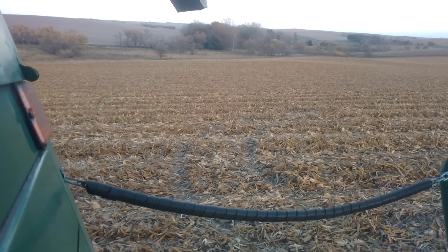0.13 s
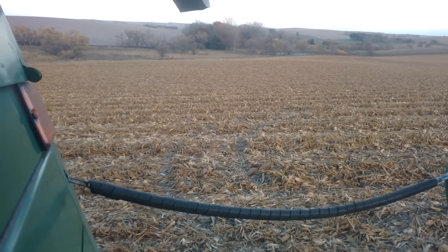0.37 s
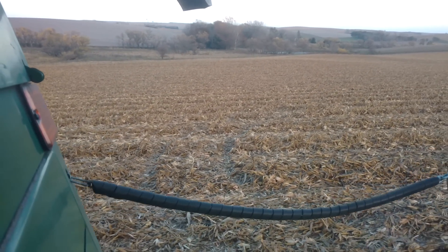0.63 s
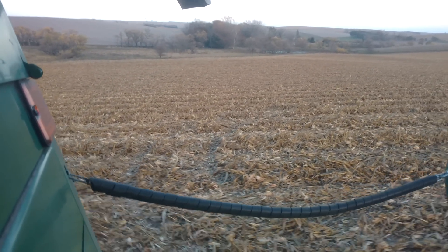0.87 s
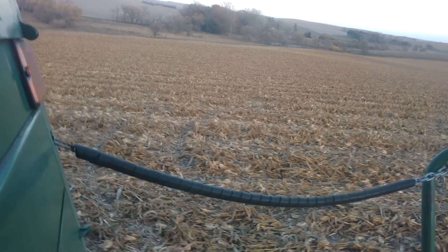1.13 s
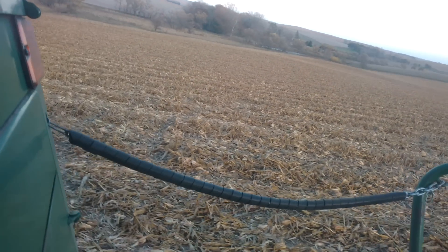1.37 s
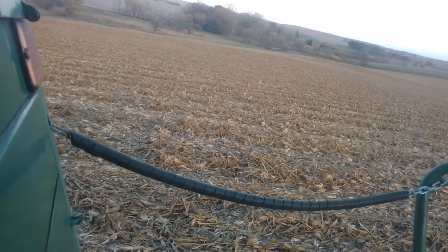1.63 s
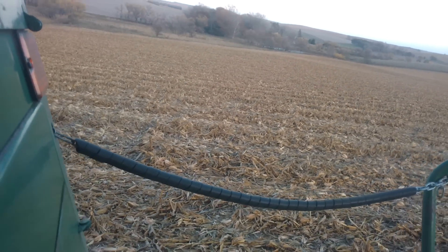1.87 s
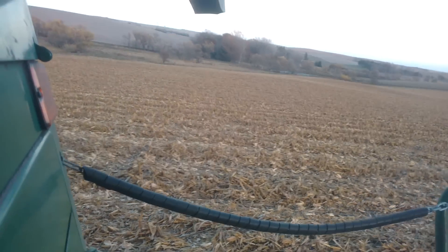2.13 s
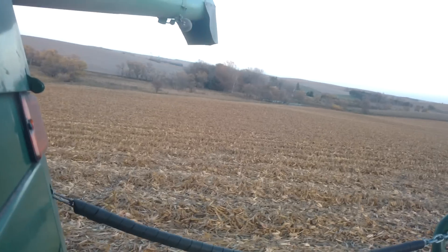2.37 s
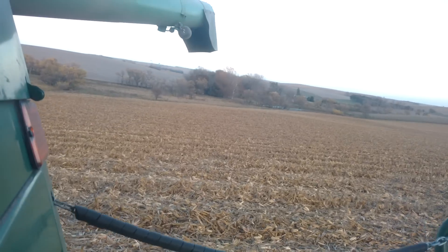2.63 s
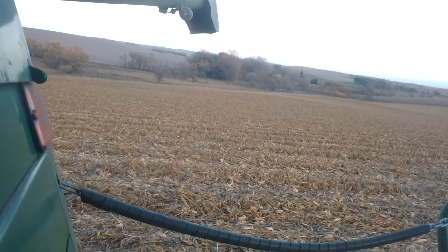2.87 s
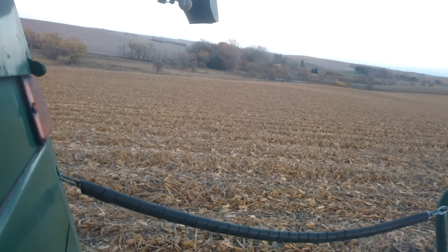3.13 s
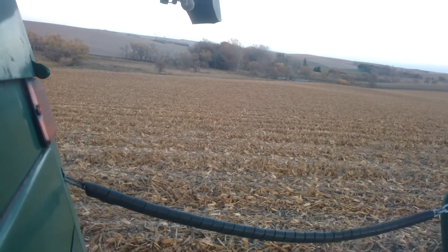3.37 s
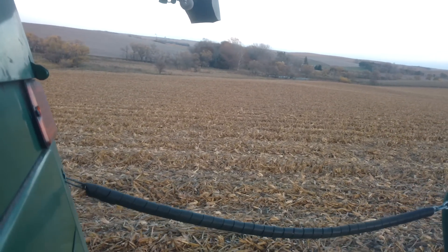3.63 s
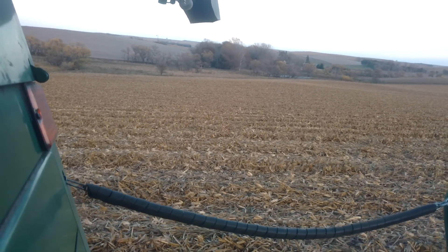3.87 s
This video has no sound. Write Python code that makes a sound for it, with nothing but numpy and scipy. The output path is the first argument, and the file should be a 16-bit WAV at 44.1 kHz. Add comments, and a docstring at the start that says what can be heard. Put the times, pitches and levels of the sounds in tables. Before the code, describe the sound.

Steady engine roar and a mid-pitched hydraulic whine from a harvester, with small dry rattles and knocks.

```python
"""In a stubble field a large farm machine runs, heard from its platform on a small hand-held recorder.
A pump whine, a wandering moan and the orders of a loaded shaft are sums of wavering sinusoids; panels hum as
narrow noise resonances. A broad roar of engine, fan and crop is random short-time spectra; chaff ticks are
filtered impulses with grit, one puff is a noise burst, and faint metal knocks are decaying clusters of modes.
Two microphone ports are widened by delayed cross-subtraction."""
import sys
import numpy as np
from scipy import signal
from scipy.fft import rfft, irfft, next_fast_len
from scipy.io import wavfile
from scipy.ndimage import uniform_filter1d

SR = 44100
rng = np.random.default_rng(int(sys.argv[2]) if len(sys.argv) > 2 else 0)


def dump_mix(stems):
    """Bounce the given channels to the path in sys.argv[1] as a 16-bit WAV at rate SR."""
    frames = np.atleast_2d(stems).T  # one column per channel
    limited = np.clip(frames, -1, 1)  # hard clip at full scale
    pcm = np.round(limited * 32767).astype(np.int16)
    wavfile.write(sys.argv[1], SR, pcm)


def magnitude_from_level(level_db):
    """Linear magnitude for a level in decibels (20 dB per decade)."""
    exponent = np.asarray(level_db, float) / 20
    return 10 ** exponent


N = 176400
T = np.arange(N) / SR
WANDER_HZ = 3  # drift of the hums in pitch, rms at most
HUM_SINK_DB = 2.8  # rms level drift of the moan and the passing hums


def evened(x):
    """Normalisation: scales to rms 1."""
    return x / np.sqrt(np.mean(abs(x) ** 2) + 1e-20)


def curve(rows, column=1, t=T):
    """Linear interpolation of a control curve in time."""
    return np.interp(t, [r[0] for r in rows], [r[column] for r in rows])


def slow(rate_hz, size=N):
    """Band-limited random drift: straight lines between Gaussian knots, rms about 1."""
    step = round(SR / rate_hz)
    knots = rng.standard_normal(size // step + 2)
    return 1.2 * np.interp(np.arange(size) / step, np.arange(len(knots)), knots)


def ports(z, db, pan_db, lead):
    """Interaural-style level and phase differences: sets an analytic signal on two ports, lead in rad."""
    side = magnitude_from_level(pan_db / 2) * np.exp(.5j * lead)
    return np.sqrt(2) * magnitude_from_level(db) * np.array([(z * side).real, (z / side).real])


def tone(hz):
    """Phase integration of a frequency, with small random modulation of level and phase."""
    level_db, phase_rad = 1.0 * slow(rate_hz=23), 0.1 * slow(rate_hz=30)
    cycles = np.cumsum(hz) / SR + rng.random()
    return magnitude_from_level(level_db) * np.exp(1j * (2 * np.pi * cycles + phase_rad))


def hum(hz, width_hz, size=N):
    """Resonance: complex noise through two equal one-pole filters, shifted to a drifting centre."""
    pole = np.exp(-np.pi * width_hz / SR)
    z = rng.standard_normal((size + SR, 2)) @ [1, 1j]
    for _ in range(2):
        z = signal.lfilter([1], [1, -pole], z)
    z = z[SR:]  # the first second lets the filters settle
    drift = min(width_hz, WANDER_HZ) * slow(rate_hz=2, size=size)
    return evened(z) * np.exp(2j * np.pi * np.cumsum(hz + drift) / SR)


def add(mix, s, sound):
    """Superposition: mixes a two-port sound in at time s."""
    at = round(s * SR)
    sound = sound[:, max(-at, 0):N - at]
    mix[:, max(at, 0):max(at, 0) + sound.shape[1]] += sound


# Pump speed and whine. Each row: time in seconds, shaft speed in Hz, level in dB of the seventh order
# before the port gain.
PUMP_RUN = [(0, 73.14, -17), (.25, 72.8, -17), (.7, 73.4, -20), (.9, 73.6, -19), (1.12, 73.8, -24.5),
            (1.24, 73.6, -24), (1.3, 73.6, -19), (1.5, 73.2, -15), (1.7, 72.5, -16), (2, 72.7, -16.5),
            (2.2, 73, -17), (2.36, 73.2, -10.5), (2.5, 73.4, -19.5), (2.63, 73.4, -22.5),
            (2.82, 73.4, -17.5), (3.05, 73.4, -22.5), (3.5, 73.7, -18), (3.8, 72.9, -16), (4, 73.1, -20)]
# The hand turns the recorder, shifting the whine. Each row: time in seconds, added left-right level in dB.
RECORDER_TURN = [(0, 0), (.6, 3.5), (1.2, -5), (1.8, -0.5), (2.3, -3), (2.8, 1.5), (4, 1)]
# Other pump lines. Each order of the shaft has: level in dB, left-right level in dB, left lead in rad.
PUMP_LINES = {10: (-42.5, 4, -.4), 21: (-47.5, 0.72, 2.09)}


def pump():
    """Harmonic orders: a rotating pump sounds at whole multiples of its shaft speed."""
    shaft_hz = curve(PUMP_RUN)
    whine = tone(7 * shaft_hz) * magnitude_from_level(curve(PUMP_RUN, column=2))
    out = ports(whine, db=-2.08, pan_db=2.9, lead=.1)
    out *= magnitude_from_level(np.outer([.5, -.5], curve(RECORDER_TURN)))
    return out + sum(ports(tone(k * shaft_hz), *place) for k, place in PUMP_LINES.items())


# A wandering drive. Each row: time in seconds, pitch in Hz, level in dB before the port gain.
DRIVE_MOAN = [(0, 364.5, -33.5), (.5, 364.2, -30.5), (.58, 366, -24.5), (.72, 369, -30), (.85, 371, -21.5),
              (1.22, 370.8, -30.5), (1.36, 367, -21), (1.6, 364.5, -24.5), (2.3, 367.8, -35),
              (3.05, 363.3, -35.5), (3.3, 364.4, -25.5), (4, 360.7, -37)]


def moan():
    """Frequency and amplitude modulation: one line of a drive wanders in pitch and level."""
    level_db = curve(DRIVE_MOAN, column=2) + HUM_SINK_DB * slow(rate_hz=12)
    return ports(tone(curve(DRIVE_MOAN)) * magnitude_from_level(level_db), db=0.39, pan_db=2.5, lead=0.48)


# Loaded shaft, its speed wandering up and down. Each row: time in seconds, shaft speed in Hz.
SHAFT_SPEED = [(0, 70), (.25, 70.2), (.7, 70.5), (1.1, 72.1), (1.55, 69.63), (1.8, 70.7), (2.5, 70.84),
               (3, 71.3), (3.3, 70.7), (3.6, 70.3), (3.95, 71.8)]
# Lines of that shaft. Each order has: level in dB, left-right level in dB, left lead in rad.
SHAFT_LINES = {3: (-28.5, -2, -0.6), 6: (-43.5, .8, .1), 8: (-34.5, .8, 1.3), 12: (-48.5, 2.5, .1)}


def loaded_shaft():
    """Harmonic orders: all lines of the loaded shaft follow one changing speed."""
    shaft_hz = curve(SHAFT_SPEED)
    return sum(ports(tone(k * shaft_hz), *place) for k, place in SHAFT_LINES.items())


# Panels that hum all the time. Each row: centre in Hz, width in Hz of each of two cascaded filters,
# level in dB, left-right level in dB, left lead in rad.
STEADY_PANELS = [(113.6, 3.7, -30, 1.4, 0.5), (134.1, 4.2, -28, 1.5, 0.38), (153.5, 4.5, -35, 3, 0.15),
                 (172.3, 1.9, -38, 0, -0.1), (727, 24, -41.5, -1.5, -0.6), (943, 30, -45.5, -2, 1),
                 (1846, 61, -48, -6.5, 3), (2050, 80, -47.5, 0, 2.5), (2260, 60, -50.5, 0.5, 2.5),
                 (2680, 82, -52, -1, -1.5), (3294, 120, -57.5, 2.5, 0.6), (10820, 460, -72, 4.5, 1)]


def panels():
    """Forced resonance: sheet metal turns noise into narrow bands around its modes."""
    return sum(ports(hum(hz, width_hz), *place) for hz, width_hz, *place in STEADY_PANELS)


# Hums that come and go. Each row: start in seconds, length in seconds, mean pitch in Hz,
# level in dB before swell and drift, left-right level in dB.
PASSING_HUMS = [(-.3, .9, 330, -27, -1), (.3, 1.6, 494, -29, 2), (1.12, .25, 499, -23, 1),
                (.45, 1.65, 622, -33, 1), (2.8, .7, 598, -36, 4), (3.15, .4, 300, -33, 3),
                (3.1, .7, 742, -40, 0), (2.15, .3, 211, -28, -3), (3.2, .45, 458, -34, 2)]


def passing_hums():
    """Amplitude envelopes: single wandering lines swell up and fade out."""
    out = np.zeros((2, N))
    for s, length_s, hz, db, pan_db in PASSING_HUMS:
        size = round(length_s * SR)
        line = tone(hz + WANDER_HZ * slow(rate_hz=4))[:size]
        swell = np.hanning(size) ** .3
        drift = magnitude_from_level(HUM_SINK_DB * slow(rate_hz=8, size=size))
        add(out, s, ports(line * drift * swell, db, pan_db, lead=0))
    return out


# Chaff ticks. Each row: start in seconds, peak level in dB before the common lift, left-right level in dB,
# dullness in dB (low part over high part, before the common body is added).
CHAFF_TICKS = [(.3945, -45, 4, 0), (.596, -45, 2, 2), (.9829, -37, 3, 4), (1.0038, -36, 1, -6),
               (1.0337, -44, 0, 2), (1.2872, -41, 3, 2), (1.3176, -44, 0, 7), (1.6773, -44, 3, 4),
               (1.7721, -43, 2, 5), (1.9237, -40, 4, -3), (2.479, -41, 1, 1), (2.7798, -45, 0, 7),
               (2.8895, -37, 3, 3), (3.0136, -35, 3, 3), (3.2243, -32, 4, 0)]


def chaff():
    """Impulse response: dry clicks with gritty tails excite a dull and a bright band, amid tiny ticks."""
    lift_db, body_db, grit_level, t60_s = 3.2, 5, .45, .005
    small_per_s, small_floor_db = 5, -60  # the floor is before the lift too
    out, t = np.zeros((2, N)), T[:600]
    rows = list(CHAFF_TICKS)
    for place, rarity, side in rng.random((round(4 * small_per_s), 3)):
        small_db = small_floor_db - 4 * np.log(1 - rarity)  # exponential spread: few loud ones
        rows.append((4 * place, small_db, 12 * side - 6, 6.))
    for s, db, pan_db, dull_db in rows:
        tails = grit_level * rng.standard_normal((3, len(t))) * magnitude_from_level(-60 * t / t60_s)
        clicks = tails + (t == 0)
        clicks = clicks[0] + clicks[1:]  # one shared part plus one of each port's own
        parts = []
        for hz in (4700, 9700):
            band = signal.butter(3, [hz / 1.7, hz * 1.33], "band", fs=SR, output="sos")
            part = signal.sosfilt(band, clicks)
            parts.append(part / abs(part).max())
        low, high = parts
        both = magnitude_from_level(dull_db + body_db) * low + high
        add(out, s, both * magnitude_from_level(db + lift_db + np.array([[pan_db], [-pan_db]]) / 2))
    return out


def dust_puff():
    """Partial coherence: a grainy treble noise burst, partly shared by the two ports."""
    start_s, length_s, gain_db, grain_db = 1.0, .085, -48, 3
    out, size = np.zeros((2, N)), round(length_s * SR)
    grain = magnitude_from_level(gain_db + grain_db * slow(rate_hz=400, size=size))
    envelope = np.hanning(size) ** .4
    shared, left, right = (hum(hz=8700, width_hz=5600, size=size).real for _ in range(3))
    add(out, start_s, (shared + .5 * np.array([left, right])) * grain * envelope)
    return out


# Knocks on the housing. Each row: start in seconds, level in dB before rise and decay, central pitch in Hz.
HOUSING_KNOCKS = [(0.979, -31, 2050), (1.3, -41, 1950), (2.39, -39, 2000), (2.954, -35.5, 1438),
                  (3.08, -26.5, 2000), (3.081, -35, 3256), (3.71, -37, 1404)]


def knocks():
    """Modal decay: each dull blow rings sixteen close modes around one pitch."""
    t60_s, rise_s, spread = .12, .006, .3  # spread is a share of the pitch
    out, t = np.zeros((2, N)), T[:SR // 4]
    envelope = np.minimum(t / rise_s, 1) * magnitude_from_level(-60 * t / t60_s)
    for s, db, hz in HOUSING_KNOCKS:
        place, turn = rng.random((2, 16))
        mode_hz = hz * (1 + spread * (place - .5))
        ring = np.exp(2j * np.pi * (mode_hz * t[:, None] + turn)).sum(1) / np.sqrt(16)
        add(out, s, ports(ring * envelope, db, pan_db=1.5, lead=1.3))
    return out


# Roar at the two ports. Each row: frequency in Hz, density in dB per Hz before trim and swell,
# left-right level in dB, likeness of the ports from 0 to 1, left lead in rad.
ROAR_SPECTRUM = [(30, -69, -5, 0.74, 1), (55, -63.5, -8, 0.67, 7.5), (81, -65.5, -0.5, 0.6, 2.5),
                 (115, -38.5, 0, 0.85, 0.23), (194, -46.5, -0.5, 0.85, -0.33), (243, -49, 1.5, 0.7, -0.2),
                 (295, -47.5, -5, 0.75, 0.32), (437, -50.5, 4, 0.6, -0.03), (582, -53, 7, 0.5, -0.05),
                 (790, -59, 1, 0.6, -0.5), (1047, -62, 2.5, 0.3, 0.84), (1246, -70.5, -0.5, 0.07, -1.5),
                 (1590, -68.0, 8, 0.7, 3), (2000, -65, -7, 0.59, 2), (2380, -68.5, -3.5, 0.6, 3.5),
                 (3080, -76.5, -6.5, 0.1, -0.5), (3250, -73.5, -0.5, 0.3, 4), (3800, -80, 2, 0.1, -3.5),
                 (5260, -83.5, -6.5, 0, -1.5), (6450, -92, -6, 0, 6), (8200, -94.5, 2, 0.09, -2.5),
                 (10600, -100, -1, 0, 5), (11500, -103.1, -3, 0, -12), (14000, -109.3, 1.5, 0.11, 9),
                 (15400, -119.3, -1.5, 0.15, -1.5)]
# Crop flow through the machine. Each row: time in seconds, level in dB (used relative to a mean).
CROP_FLOW = [(0, -38.5), (.25, -37.5), (.6, -36), (1, -33.5), (1.15, -34.5), (1.3, -32.5), (1.5, -35.5),
             (1.65, -37.5), (2.1, -36.5), (2.38, -34), (2.6, -37), (3.1, -35), (3.35, -35), (3.41, -37.5),
             (3.47, -36), (4, -36.5)]
# How far each band follows the swell. Each row: frequency in Hz, share of the swell as a factor.
SWELL_SHARE = [(100, 0.24), (400, 0.88), (900, 0.91), (2000, 1.5), (6000, 0.87), (14000, .6)]


def roar():
    """Partly coherent noise: random short-time spectra, shaped per port, swell with the crop flow."""
    trim_db, patch_db, flicker_db, ripple_db, flow_mean_db = -0.5, 0.92, 0.84, 1.2, -35.5
    frames, hz = N // 256 + 5, np.fft.rfftfreq(1024, 1 / SR)
    f, db, pan_db, like, lead = np.transpose(ROAR_SPECTRUM)

    def read(at, values):
        """Interpolation on a logarithmic frequency axis."""
        return np.interp(np.log(hz + 1), np.log(at), values)[:, None]

    a, b, c, d, patch = rng.standard_normal((frames, 513, 5)).T
    patch = uniform_filter1d(patch, size=14, axis=0)
    patch = evened(uniform_filter1d(patch, size=10, axis=1))
    flicker = evened(uniform_filter1d(rng.standard_normal(frames), size=3))
    # many small housing resonances roughen the spectrum; the ports dull at the very top
    ripple = ripple_db * evened(uniform_filter1d(rng.standard_normal(513), size=2))
    top_loss = -2.5 * np.maximum(hz - 12000, 0) / 1000  # dB, 2.5 per kHz
    swell = curve(CROP_FLOW, t=np.arange(frames) * 256 / SR) - flow_mean_db
    moving = read(*np.transpose(SWELL_SHARE)) * (swell + flicker_db * flicker)
    level_db = trim_db + read(f, db) + (ripple + top_loss)[:, None] + patch_db * patch + moving

    same = read(f, np.clip(like, 0, .99) * np.exp(-1j * lead))  # complex coherence
    left, own = a + 1j * b, c + 1j * d
    right = same * left + np.sqrt(1 - abs(same) ** 2) * own
    pan = magnitude_from_level(read(f, pan_db) / 2)
    z = np.array([left * pan, right / pan]) * magnitude_from_level(level_db)
    z *= hz[:, None] < f[-1] + 400
    noise = signal.istft(z, nperseg=1024, noverlap=768)[1][:, :N]
    return noise * np.sqrt(SR / 1024 * 1.5)  # frame spectra to density per Hz


def scene():
    """Superposition of all sources as they reach the two ports."""
    machine = pump() + moan() + loaded_shaft() + panels() + passing_hums()
    return machine + chaff() + dust_puff() + knocks() + roar()


def band_limit(x):
    """A steep low-pass at the top of the band."""
    return signal.sosfilt(signal.butter(12, 15820, fs=SR, output="sos"), x)


def record(dry):
    """Delay-and-subtract directivity: each channel loses a delayed, dulled copy of the other port."""
    cross_gain, delay_s, top_hz = 0.76, 1 / 2530, 14000
    size = next_fast_len(N + 64)
    hz = np.fft.rfftfreq(size, 1 / SR)
    path = np.exp(-2j * np.pi * hz * delay_s - (hz / top_hz) ** 8)
    late = irfft(rfft(dry[::-1], size) * path, size)[:, :N]
    return band_limit(dry - cross_gain * late)


dry = scene()
out = record(dry)
dump_mix(out)
```